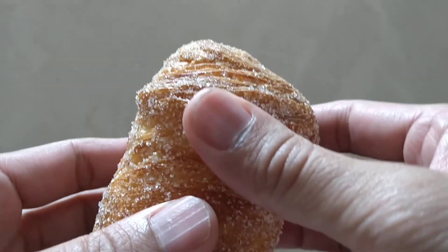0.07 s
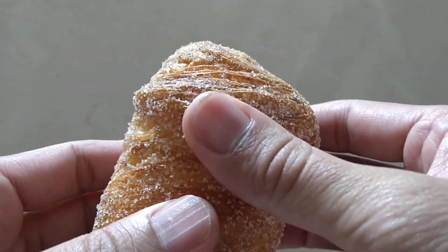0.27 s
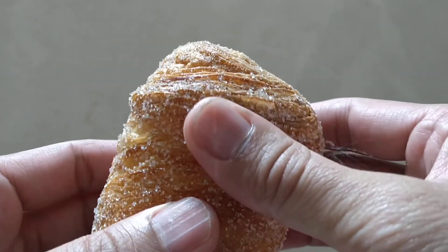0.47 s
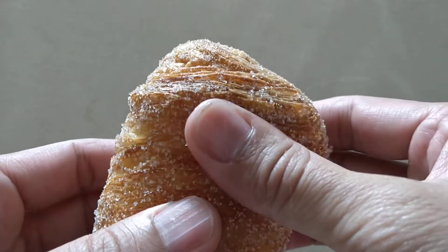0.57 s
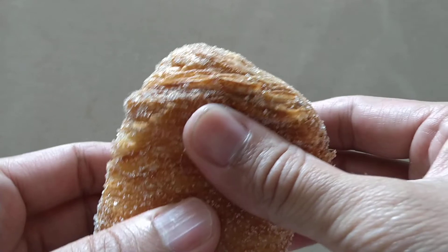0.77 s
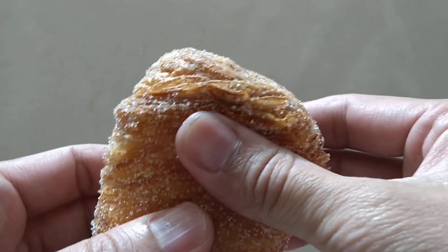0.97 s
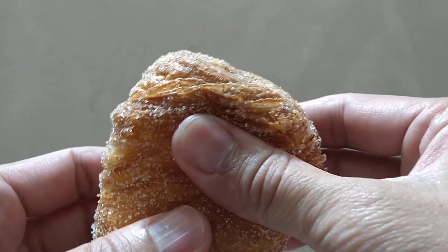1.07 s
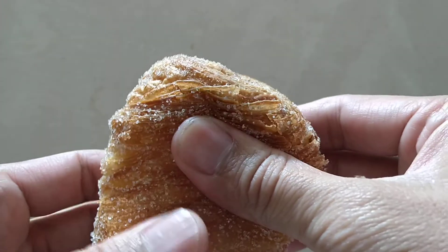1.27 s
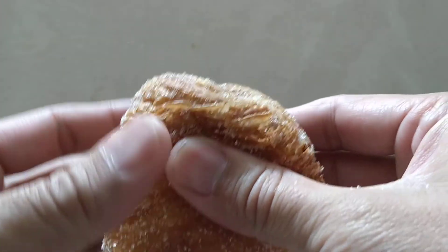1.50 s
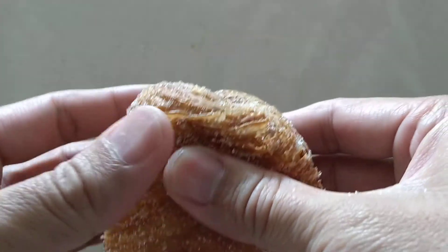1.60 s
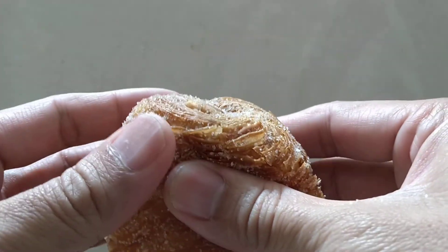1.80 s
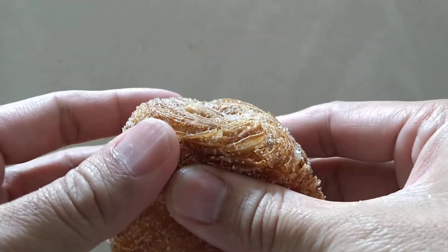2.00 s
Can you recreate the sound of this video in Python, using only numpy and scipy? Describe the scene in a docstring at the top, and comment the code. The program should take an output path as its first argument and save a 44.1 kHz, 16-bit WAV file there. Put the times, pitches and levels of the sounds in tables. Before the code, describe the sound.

Crisp crackling of a flaky sugared pastry squeezed by hand, swelling and dying away.

```python
"""Squeezing a flaky pastry

Two thumbs squeeze a sugar-coated pastry close to a phone in a quiet, humming room. Flakes of crust
fracture in sharp snaps over a dense crackle of sugar and thin layers, which swells with the squeeze
and dies away. The hollows of pastry and hands resonate, and skin rubs softly as the grip shifts."""
import sys
import numpy as np
from scipy import signal
from scipy.fft import rfft, irfft, next_fast_len
from scipy.io import wavfile

SR = 44100
rng = np.random.default_rng(int(sys.argv[2]) if len(sys.argv) > 2 else 0)


def transcribe(u):
    """Save the signal u as a 16-bit wav file named by the first command-line argument.

    u: samples, shape (n,) or (channels, n), limited to [-1, 1]; the rate is SR.
    q: integer samples, one column per channel.
    """
    v = np.clip(np.atleast_2d(u).T, -1, 1)
    q = np.round(v * 32767).astype(np.int16)
    wavfile.write(sys.argv[1], SR, q)


N = 90404
TOP_HZ = 15950
PORT_CORRELATION = [0.46, 0.076, 0.098]  # between microphone ports: body, crack, sizzle of a break


def amp(db):
    """Amplitude ratio of a level in decibels."""
    return 10 ** (np.asarray(db) / 20)


def unit(x):
    """Normalisation to an RMS of 1."""
    return x / np.sqrt(np.mean(x ** 2) + 1e-20)


def along(points, hz):
    """Interpolation of (frequency [Hz], value) points on a logarithmic frequency axis."""
    frequencies, values = np.transpose(points)
    return np.interp(np.log(hz + 1), np.log(frequencies + 1), values)


def envelope(rows):
    """Amplitude envelope through (time [s], level [dB]) rows."""
    return amp(np.interp(np.arange(N) / SR, *np.transpose(rows)))


def filtered(x, response):
    """Linear filtering: the spectrum is multiplied by a frequency response."""
    n = x.shape[-1]
    padded = next_fast_len(2 * n)
    return irfft(rfft(x, padded) * response(np.fft.rfftfreq(padded, 1 / SR)), padded)[..., :n]


def coloured(x, points):
    """Spectral shaping by (frequency [Hz], gain [dB]) points."""
    return filtered(x, lambda hz: amp(along(points, hz)))


def panned(pan_db):
    """Constant-power panning: left and right gains from their level difference."""
    gains = amp(np.array([pan_db, -pan_db]) / 2)
    return gains / np.sqrt(np.mean(gains ** 2, axis=0))


def resonance(hz, centre_hz, width_hz):
    """Response of a damped oscillator, 1 at its centre frequency."""
    return 1j * hz * width_hz / (centre_hz ** 2 - hz ** 2 + 1j * hz * width_hz)


def tone(hz):
    """A sinusoid of unit RMS and random phase."""
    t = np.arange(N) / SR
    return np.sqrt(2) * np.sin(2 * np.pi * (hz * t + rng.random()))


def room_air(level_db=-60.5):
    """Ambient noise: partly coherent at the two ports in the bass, incoherent in the treble."""
    # noise spectrum: (frequency [Hz], relative density [dB])
    spectrum = [(15, -3), (25, -16), (40, -18), (60, 6), (90, -2.5), (140, -8), (190, -7), (250, -15),
                (380, -8.5), (600, -11.5), (850, -11), (1200, -16), (1500, -18), (2000, -20.5),
                (4000, -27.5), (8000, -45.5), (16000, -35)]
    # likeness of left and right: (frequency [Hz], correlation [1])
    correlation = [(60, 0.33), (150, 0.94), (300, 0.86), (700, 0.27), (2000, 0), (8000, 0)]

    def mid_and_side(hz):
        angle = np.arccos(along(correlation, hz)) / 2
        return amp(along(spectrum, hz)) * [np.cos(angle), np.sin(angle)]

    mid, side = filtered(rng.standard_normal((2, N)), mid_and_side)
    return amp(level_db) * unit(np.array([mid + side, mid - side]))


def room_hum(drone_hz=74.4):
    """Superposition of steady tones, a drone that swells and fades, and a narrow-band rumble."""
    # steady tones: (frequency [Hz], level [dB])
    partials = [(57.5, -72.5), (119.5, -69.5), (596, -79)]
    # envelopes of drone and rumble: (time [s], level [dB])
    drone_levels = [(0, -59), (.12, -65.5), (.2, -51), (.29, -53), (.39, -54), (.46, -64.5), (.55, -53.5),
                    (.7, -59.5), (.82, -64), (2.05, -86)]
    rumble_levels = [(0, -64), (.9, -68.5), (1.1, -60.5), (1.22, -51.5), (1.3, -64), (1.4, -55.5),
                     (1.55, -54), (1.62, -65), (2.05, -61.5)]
    # rumble spectrum: (frequency [Hz], gain [dB])
    rumble_colour = [(20, -39), (40, -2.5), (57, 9), (70, -10.5), (88, 5.5), (130, -14.5), (300, -90),
                     (1000, -95)]
    hum = sum(amp(db) * tone(hz) for hz, db in partials)
    drone = envelope(drone_levels) * tone(drone_hz)
    rumble = envelope(rumble_levels) * unit(coloured(rng.standard_normal(N), rumble_colour))
    return (hum + drone + rumble) * panned(pan_db=1.6)[:, None]


def fracture(decay_s, ring_db, correlation, ring_s=0.0032, size=640, lead=64):
    """Brittle fracture: after lead silent samples, a noise burst and the crust's ring decay together."""
    t = np.arange(size) / SR
    decay = np.exp(-t / decay_s) + amp(ring_db) * np.exp(-t / ring_s)
    common = np.sqrt(correlation) * rng.standard_normal(size)
    separate = np.sqrt(1 - correlation) * rng.standard_normal((2, size))
    return np.pad(decay * (common + separate), ((0, 0), (lead, 0)))


def crackle(breaks_per_s=700, colours=24, crossover_hz=5230):
    """Acoustic emission: tiny breaks of uneven size, place and colour arrive as a Poisson process."""
    # crackle envelope: (time [s], level [dB])
    levels = [(0, -77), (.13, -78), (.2, -67.5), (.29, -60), (.35, -51), (.4, -43), (.45, -49.5),
              (.535, -48.5), (.575, -41.5), (.69, -40), (.76, -49), (.88, -47), (.99, -47), (1.04, -53.5),
              (1.21, -55), (1.34, -51.5), (1.41, -70.5), (1.6, -78), (1.69, -63.5), (1.77, -65.5),
              (1.85, -71), (1.95, -74), (2.05, -63)]
    # mean spectrum of the breaks: (frequency [Hz], gain [dB])
    spectrum = [(150, -19), (500, -13), (1000, -10.5), (1500, -11.5), (2000, -7), (3000, -5), (4500, -0.5),
                (6800, 0), (8000, -6), (11000, -5.5), (15300, 5.5)]
    # sugar gives way first, coarser layers later: (time [s], gain below the crossover [dB])
    middle_gains = [(.25, -2), (.48, -4), (.57, -2.5), (.7, -1.5), (.86, 0), (1.35, -2)]
    size_spread_db, size_cap_db, colour_spread_db = 4, 11, 5
    pan_db, pan_spread_db = 3, 4
    knots_hz = np.geomspace(1000, TOP_HZ, 8)
    breaks = np.zeros((2, N))
    for _ in range(colours):
        hits = rng.random(N) < breaks_per_s / colours / SR
        strength = amp(np.minimum(size_spread_db * rng.standard_normal(N), size_cap_db))
        ticks = hits * strength * panned(pan_db + pan_spread_db * rng.standard_normal(N))
        colour = np.column_stack([knots_hz, colour_spread_db * rng.standard_normal(len(knots_hz))])
        grain = fracture(decay_s=0.00012, ring_db=-7.5, correlation=PORT_CORRELATION[2])
        breaks += signal.fftconvolve(ticks, unit(coloured(grain, colour)), axes=1)[:, :N]
    breaks = unit(filtered(coloured(breaks, spectrum), lambda hz: hz < TOP_HZ))
    middle = filtered(breaks, lambda hz: 1 / (1 + (hz / crossover_hz) ** 10))
    treble = breaks - middle
    return (treble + middle * envelope(middle_gains)) * envelope(levels)


def snaps(lead=64):
    """Each flake radiates a transient in three bands: low body, middle crack and high sizzle."""
    # breaking flakes: (time [s], body [dB], crack [dB], sizzle [dB], leftward bias [dB])
    flakes = [(0.119, -76, -70, -63.5, 1), (0.1482, -68, -59.5, -53, -2), (0.1946, -56.5, -54, -65, 9),
              (0.2696, -76, -59, -49, 1), (0.3023, -56.5, -50.5, -47.5, 8), (0.3203, -58, -48.5, -45, 2),
              (0.3372, -67, -47.5, -42.5, 8), (0.3448, -52.5, -46, -45, 23), (0.378, -61, -48.5, -43, 4),
              (0.3864, -50.5, -44, -44, 6), (0.4068, -53.5, -42, -39, -2), (0.4206, -52, -44, -37, 9),
              (0.4705, -46.5, -41.5, -42.5, 24), (0.4822, -59, -57, -33, 5), (0.5187, -72, -47, -34.5, 2),
              (0.531, -42, -41, -45, 0), (0.549, -57, -39, -31, -3), (0.5516, -38, -32, -28.5, 5),
              (0.5729, -48.5, -34.5, -29, 0), (0.591, -48.5, -40, -37, 16),
              (0.596, -48.5, -38.5, -32.5, -6), (0.612, -38, -42, -40, 36), (0.6315, -44, -52, -40, 3),
              (0.6378, -53, -35, -28, 9), (0.6531, -46.5, -35.5, -37, 5), (0.6668, -69, -49, -29.5, 14),
              (0.683, -40, -32, -31, -2), (0.6869, -45, -32, -32.5, 20), (0.7322, -54, -43, -46, -2),
              (0.7349, -74, -45.5, -27, 9), (0.7782, -47, -39, -41, 6), (0.806, -66, -43.5, -36.5, 6),
              (0.8394, -46.5, -43.5, -33, 9), (0.8734, -43, -48, -33.5, 11), (0.8888, -63, -50, -33, 16),
              (0.902, -64, -37.5, -35, -5), (0.929, -59, -56, -36.5, 22), (0.938, -66, -62, -56, 7),
              (0.956, -45.5, -39, -40.5, 2), (0.9765, -58, -51, -33, 27), (0.9873, -55.5, -37, -35.5, 4),
              (1.0245, -55, -47, -31, 8.5), (1.0373, -51, -46, -46, -5), (1.0587, -59, -53, -44.5, 3),
              (1.0751, -67, -60, -43, -9), (1.0911, -49.5, -46, -37.5, 7), (1.111, -70, -57, -57, 2),
              (1.125, -63, -45, -42, 4), (1.135, -55, -50.5, -44, 12), (1.1748, -52.5, -42.5, -38.5, -1),
              (1.198, -57, -45, -42.5, 0), (1.216, -66, -48.5, -46.5, 12), (1.2238, -64, -53, -43, -10),
              (1.2741, -69, -44.5, -46.5, 5), (1.291, -82, -61, -46, -6), (1.3339, -60, -51, -48, -4),
              (1.6712, -69, -64.5, -57.5, 3), (1.7638, -59, -60.5, -52.5, 1), (1.9238, -60, -51.5, -59, 9),
              (1.9764, -82, -55, -57.5, 12)]
    # body, crack and sizzle bands: (lower edge [Hz], upper edge [Hz])
    bands = [(750, 2900), (3300, 8500), (8500, 17000)]
    # spectrum of breaking crust: (frequency [Hz], gain [dB])
    crust = [(200, -18), (600, -3.5), (1100, -9), (1900, -9.5), (2800, -4), (4500, 6), (6900, 11.5),
             (7900, 0.5), (10000, 3), (13000, 6), (15400, 14.5)]
    decay_s, ring_db, trim_db = [0.00055, 0.00045, 0.00015], [-6, -14, -20.5], [-2, 0, 2]
    pan_share = [0.25, 0.57, 0.68]  # diffraction: low sound bends round the hands
    reference_s = .002  # a burst is scaled to the energy of a unit signal this long
    out = np.zeros((2, N + SR))
    for time_s, *levels, bias_db in flakes:
        start = round(time_s * SR) - lead
        for k, (low_hz, high_hz) in enumerate(bands):
            def band(hz):
                rolloff = np.sqrt((1 + (low_hz / (hz + 1)) ** 10) * (1 + (hz / high_hz) ** 20))
                return amp(along(crust, hz)) / rolloff * (hz < TOP_HZ)

            burst = filtered(fracture(decay_s[k], ring_db[k], PORT_CORRELATION[k], lead=lead), band)
            burst *= np.sqrt(reference_s * SR / np.sum(burst ** 2, axis=1, keepdims=True))
            gains = amp(levels[k] + trim_db[k]) * panned(bias_db * pan_share[k])[:, None]
            out[:, start:start + burst.shape[1]] += gains * burst
    return out[:, :N]


def hollows(x):
    """Cavity resonance: the pastry and cupped hands reinforce a few narrow bands."""
    # cavity modes: (frequency [Hz], bandwidth [Hz], gain [1])
    modes = [(1110, 60, 1.06), (1434, 99, 1.94), (2130, 100, 0.25)]
    return filtered(x, lambda hz: 1 + sum(gain * resonance(hz, f, width) for f, width, gain in modes))


def reverberation(x, reflections=10, early_db=-12.5, tail_db=-11):
    """Early reflections from near surfaces join a short, exponentially decaying diffuse tail."""
    # decay of the room: (frequency [Hz], reverberation time [s])
    t60 = [(200, 0.64), (2000, 0.1), (8000, 0.14), (16000, 0.059)]
    hz, t, spectra = signal.stft(rng.standard_normal((2, SR // 2)), SR, nperseg=256)
    tail = signal.istft(spectra * amp(-60 * t / along(t60, hz)[:, None]), SR, nperseg=256)[1]
    response = amp(tail_db) * tail / np.linalg.norm(tail[0])
    for side in response:
        delays = (rng.uniform(.002, .028, reflections) * SR).astype(int)
        side[delays] += amp(early_db) * rng.standard_normal(reflections) / np.sqrt(reflections)
    return signal.fftconvolve(x, response, axes=1)[:, :N]


def rub():
    """Friction noise: skin slides over the crust and excites the hollow of the hands."""
    # a soft swell as the grip shifts: (time [s], level [dB])
    levels = [(1.25, -74), (1.5, -66), (1.75, -74.5), (2.05, -84)]
    # resonances of the hands: (frequency [Hz], bandwidth [Hz], gain [dB])
    modes = [(600, 45, 0), (770, 80, -7), (1440, 170, -9)]
    cavity = lambda hz: sum(amp(db) * np.abs(resonance(hz, f, width)) ** 2 for f, width, db in modes)
    return unit(filtered(rng.standard_normal(N), cavity)) * envelope(levels)


def scene():
    """Superposition of the pastry, its reverberation, the rub and the room's own sound."""
    # response of the right port relative to the left: (frequency [Hz], gain [dB])
    right_port = [(1000, 0.5), (1600, 5), (2600, -4), (3300, 2.5), (6200, 0), (7200, -2.5), (8200, 1),
                  (9500, 4.5), (12500, -4.5), (14500, -3)]
    left, right = hollows(snaps() + crackle())
    pastry = np.array([left, coloured(right, right_port)])
    return pastry + reverberation(pastry) + rub() + room_air() + room_hum()


def record(dry):
    """Band limiting: the phone acts as a steep low-pass filter."""
    return filtered(dry, lambda hz: 1 / np.sqrt(1 + (hz / TOP_HZ) ** 120))


dry = scene()
out = record(dry)
transcribe(out)
```